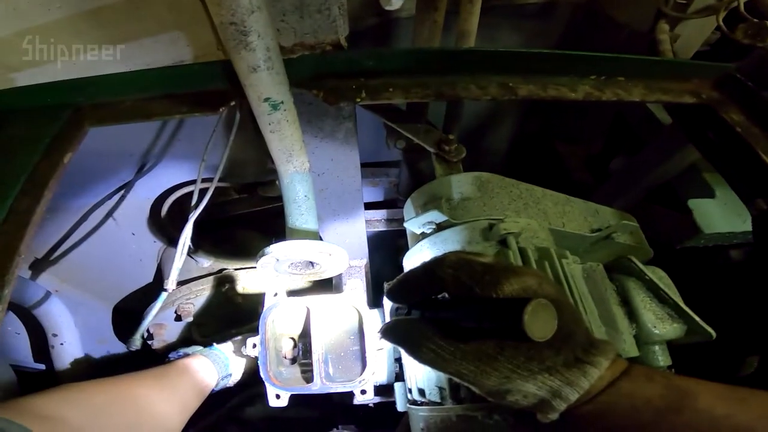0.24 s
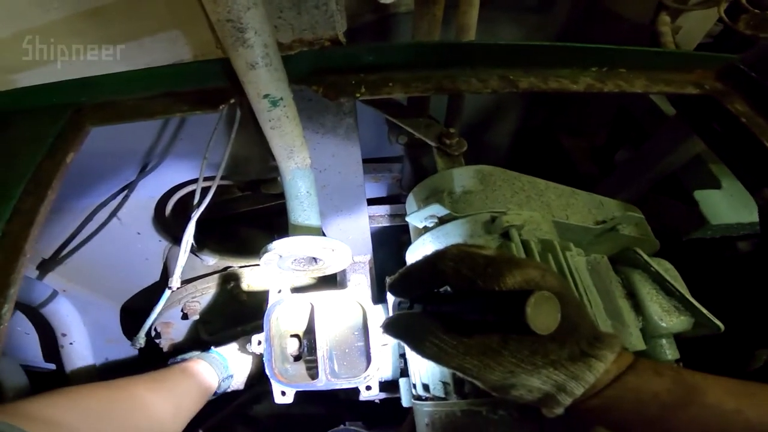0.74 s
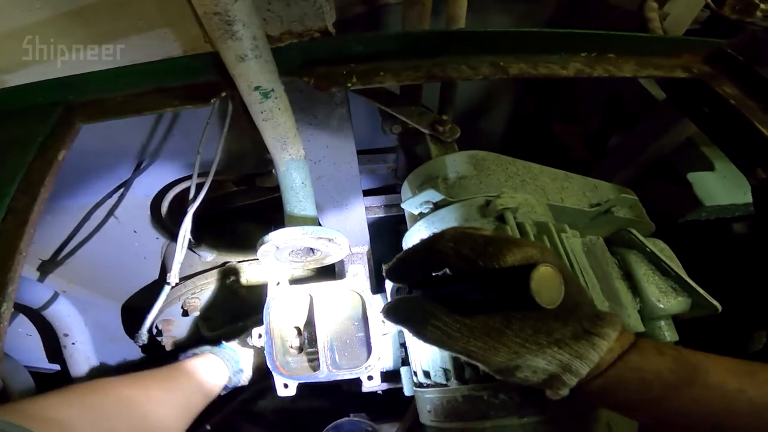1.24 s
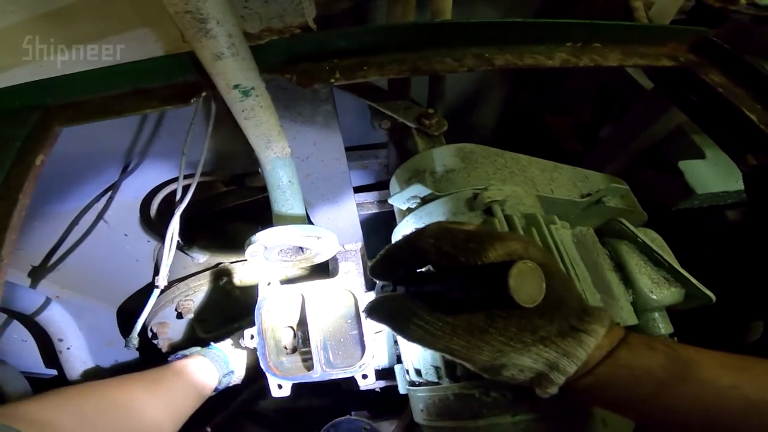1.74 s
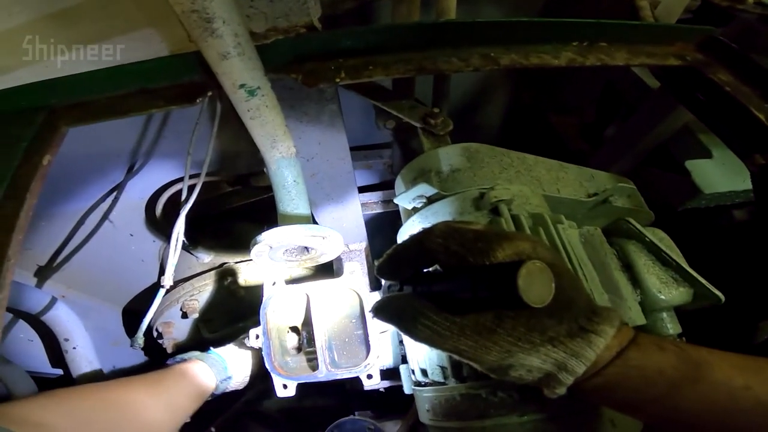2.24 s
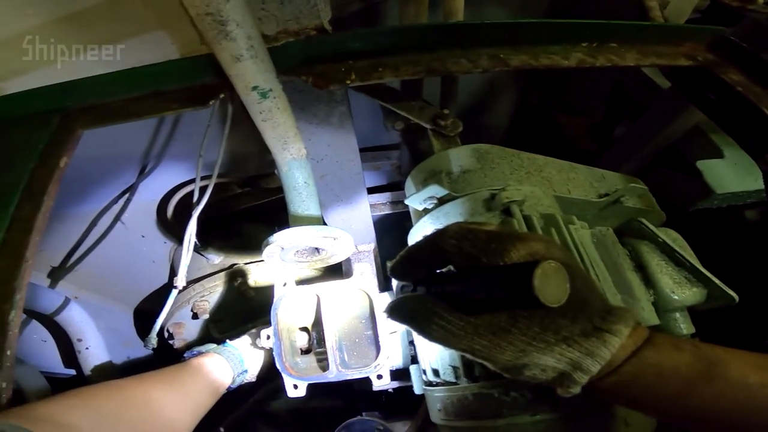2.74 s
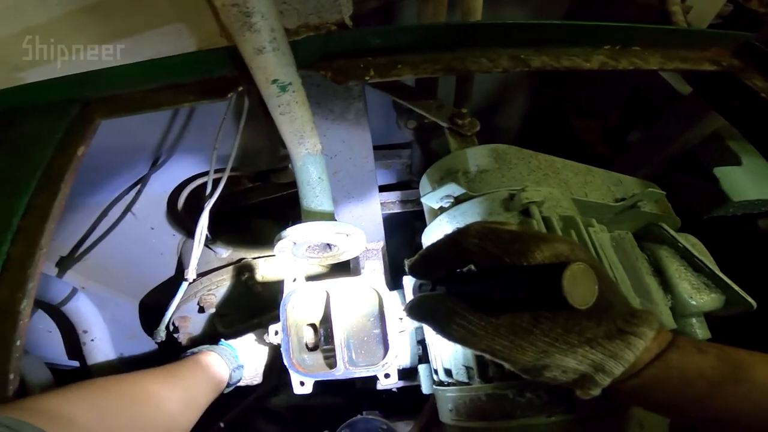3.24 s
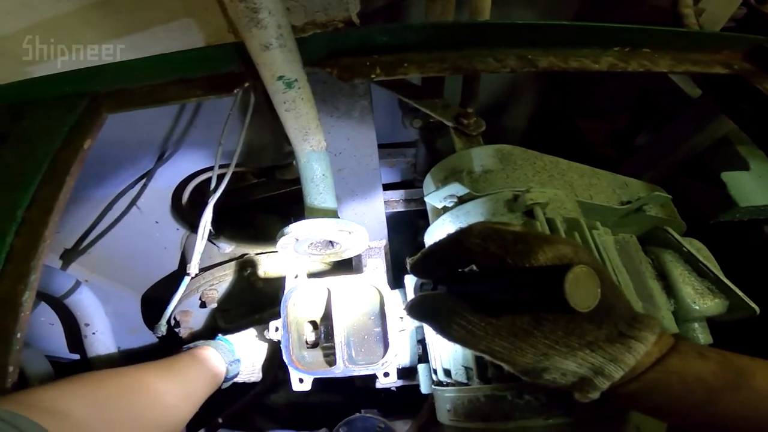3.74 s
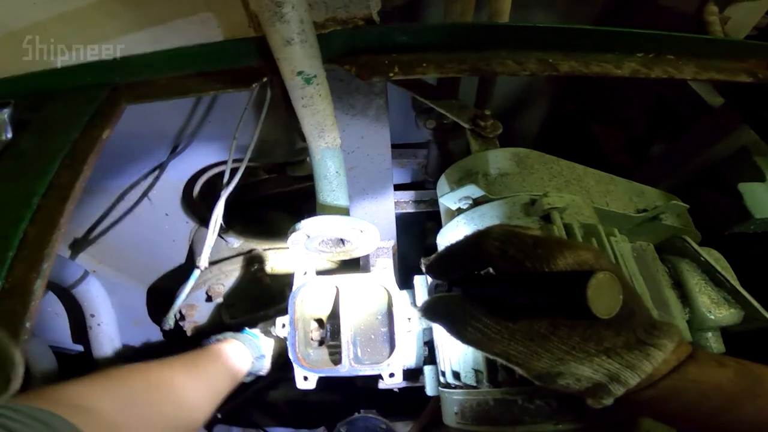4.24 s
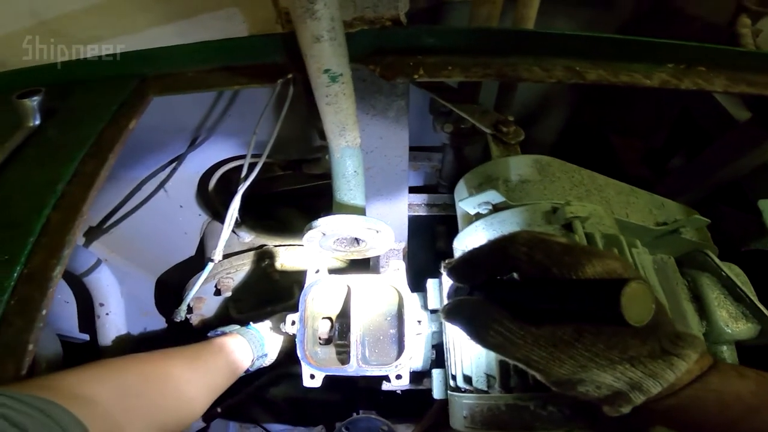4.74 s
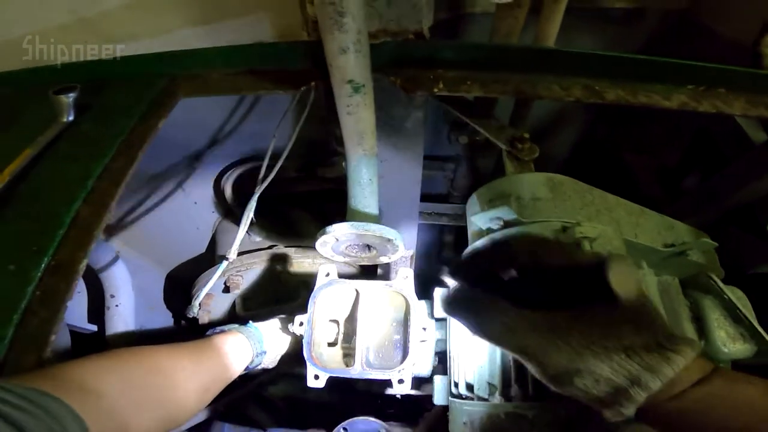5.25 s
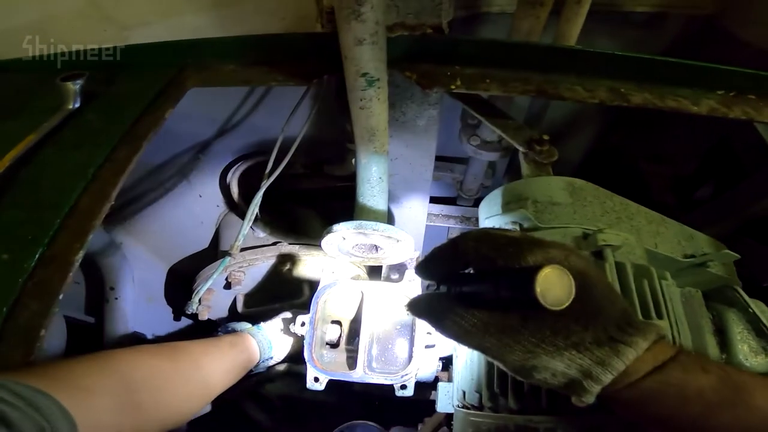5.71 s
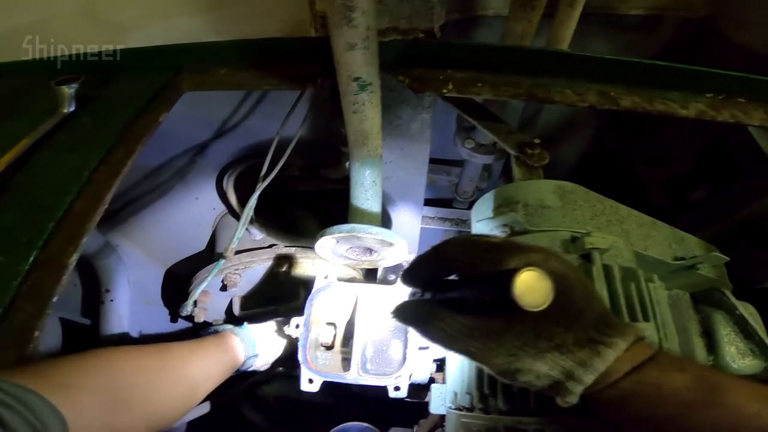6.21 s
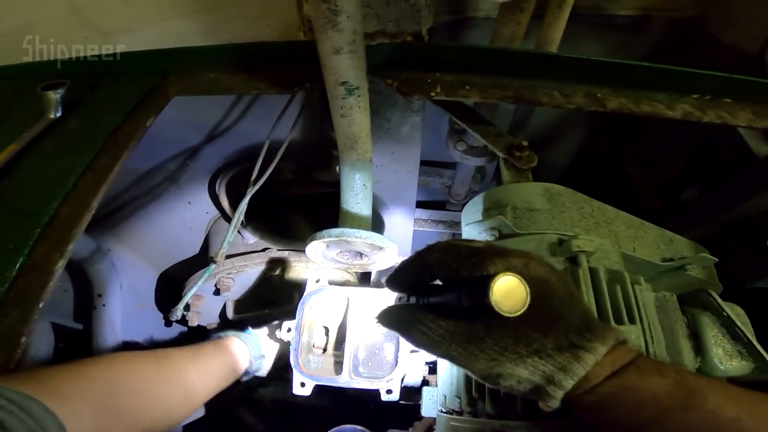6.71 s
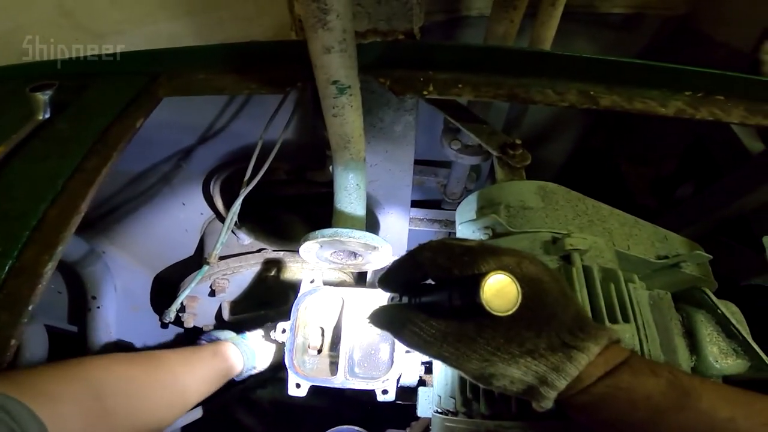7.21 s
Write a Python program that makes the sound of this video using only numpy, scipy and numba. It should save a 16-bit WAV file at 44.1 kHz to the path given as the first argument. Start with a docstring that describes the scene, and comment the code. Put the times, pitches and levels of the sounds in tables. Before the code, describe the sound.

Constant machinery roar in a steel hull, heavy in the lows, two engines humming together beneath a faint, fluttering high whistle.

```python
"""Ship's engine room under way

A slow main engine and a faster diesel generator drone through the steel, each a set of sine lines:
the main engine's waver in level, the generator's hold theirs.
Generator clatter is one burst of noise repeated every cycle; fans and pumps roar as noise shaped by the hull.
A turbocharger whines above on a blade tone with three overtones.
Two close microphone ports pick it up, and a gain control holds the loud sound down."""
import sys
import numpy as np
from scipy import signal
from scipy.fft import rfft, irfft
from scipy.io import wavfile
from scipy.ndimage import uniform_filter1d
from numba import njit

SR = 44100
rng = np.random.default_rng(int(sys.argv[2]) if len(sys.argv) > 2 else 0)


def digitize_waveform(pressure):
    """Quantize a signal to 16-bit integers and store it at the path in sys.argv[1].

    Rows of a 2-D input are taken as channels; values are limited to [-1, 1].
    """
    field = np.atleast_2d(pressure).T
    bounded = np.clip(field, -1, 1)
    quanta = np.round(bounded * 32767).astype(np.int16)
    wavfile.write(sys.argv[1], SR, quanta)


N = 329425  # length in samples

GENERATOR_CYCLE_HZ = 7.5092


def amp(db):
    """Turns decibels into a plain gain."""
    return 10 ** (np.asarray(db) / 20)


def at_hz(points, hz):
    """Reads a table between its points, on a log-frequency axis as the ear hears pitch."""
    table = np.array(points, float)
    return np.interp(np.log(hz + 1), np.log(table[:, 0]), table[:, 1])


def drift(rate_hz):
    """Slow random movement with spread 1: noise smoothed twice by a one-pole low-pass."""
    step = 40  # samples between drift points
    pole = np.exp(-2 * np.pi * rate_hz * step / SR)
    noise = rng.standard_normal(N // step + 4002)
    slow = signal.lfilter([1], [1, -2 * pole, pole * pole], noise)[4000:]  # drop the filter's start-up
    slow = (slow - slow.mean()) / slow.std()
    return np.interp(np.arange(N) / step, np.arange(len(slow)), slow)


def hum(cycle_hz, orders, wander_cycles, waver_db):
    """An engine's regular pulses make sines on whole multiples of its cycle, sharing one wandering phase."""
    cycles = np.arange(N) * cycle_hz / SR + wander_cycles * drift(0.42)
    out = np.zeros(N)
    for order, level_db in orders:
        level = amp(level_db + waver_db * drift(0.96))
        out += level * np.sin(2 * np.pi * (round(order) * cycles + rng.random()))
    side_gain = amp([[.25], [-.25]])  # slightly louder on the left
    return np.sqrt(2) * out * side_gain  # sqrt(2): table levels are RMS


def main_engine():
    """The slow main engine: a deep hum on the 12th to 72nd multiples of its turn rate, each wavering."""
    # Hum lines: multiple of the turn rate, level/dB
    main_orders = [(12, -73.5), (14, -61.5), (15, -71), (16, -66.5), (17, -67.5), (19, -70.5), (21, -63),
                   (23, -66), (24, -65.5), (27, -63.5), (28, -57.5), (32, -62), (33, -67.5), (38, -68.5),
                   (42, -53.5), (43, -65), (45, -59), (48, -53), (51, -69), (53, -53), (55, -52),
                   (59, -54.5), (69, -56), (72, -56)]
    return hum(1.7238, main_orders, wander_cycles=.0012, waver_db=2.5)


def generator():
    """The faster four-stroke diesel generator: multiples of its cycle rate, steady in level."""
    # Hum lines: multiple of the four-stroke cycle rate, level/dB
    generator_orders = [(12, -55.5), (14, -57.5), (17, -58.5), (18, -60.5), (22, -65.5), (25, -67),
                        (27, -62), (29, -54.5), (31, -55), (94, -67), (132, -67), (136, -68), (160, -72.5),
                        (178, -78.5), (207, -78.5), (231, -81)]
    return hum(GENERATOR_CYCLE_HZ, generator_orders, wander_cycles=0.0015, waver_db=0.0)


def at_ports(white, spectrum, lift_db=0):
    """Colours white noise for two ports: it reaches the left late, and the right is only partly alike."""
    # How alike the two ports hear the noise: f/Hz, likeness 0-1
    port_likeness = [(40, .996), (100, .9992), (180, .993), (350, .984), (700, .78), (1400, .72),
                     (2800, .68), (5600, .3), (8000, .05), (11000, 0)]
    # How much louder the left port is than the right: f/Hz, difference/dB
    left_bias = [(60, .2), (110, .2), (200, .8), (360, 1.3), (640, 2.2), (1160, 2), (2100, 3.8),
                 (3800, 2.5), (9000, -1)]
    left_lag_s = .00005
    hz = np.arange(N // 2 + 1) * SR / N
    gain = amp(at_hz(spectrum, hz) + lift_db) * np.sqrt(SR / 2)  # makes the table levels per Hz
    shared, own = rfft(white)
    alike = np.clip(at_hz(port_likeness, hz), 0, 1)
    left = shared * np.exp(-2j * np.pi * hz * left_lag_s)
    right = alike * shared + np.sqrt(1 - alike ** 2) * own
    bias = amp(at_hz(left_bias, hz) / 2)  # half the difference on each side
    return irfft(gain * np.array([left * bias, right / bias]), N)


def clatter():
    """Valves and injectors knock alike every cycle: one stretch of noise repeats at the generator's rate."""
    # Clatter spectrum: f/Hz, level/dB per Hz
    clatter_spectrum = [(250, -95.5), (500, -78), (1000, -83.5), (2000, -99), (3000, -103), (5000, -125),
                        (8000, -160)]
    cycle = rng.standard_normal((2, round(SR / GENERATOR_CYCLE_HZ)))
    repeats = N // cycle.shape[1] + 1
    return at_ports(np.tile(cycle, repeats)[:, :N], clatter_spectrum)


def roar(low_flicker_db=0.38, high_flicker_db=0.73):
    """Fans, pumps and combustion make broad noise, lifted by resonances; its upper ranges flicker."""
    # Roar spectrum before the resonances: f/Hz, level/dB per Hz
    roar_spectrum = [(14, -88.5), (32, -73), (60, -71), (78, -71.5), (125, -68.5), (160, -71.5), (205, -70),
                     (400, -67.5), (800, -86), (1050, -83), (2000, -92), (3000, -95.5), (4300, -104),
                     (7400, -112), (7900, -117), (10500, -126), (12400, -127)]
    # Hull and room resonances: centre f/Hz, width/Hz, lift/dB
    resonances = [(39, 8.7, 0), (117, 20, 2), (223, 12, 4.5), (235.1, 5.6, 10.5), (252.5, 5.8, 8),
                  (273.3, 10.8, 8.5), (296.7, 14.8, 8), (313, 9.2, 1.5), (342, 10, 2.5), (368, 5.6, 5),
                  (400, 5.4, 1), (514, 85, 5), (1290, 12, 2), (1733, 47, 5.5), (3700, 500, 1),
                  (8740, 1300, 4), (930, 78, 1.5), (10060, 590, 3)]
    hz = np.arange(N // 2 + 1) * SR / N
    lift_db = np.zeros(len(hz))
    for centre_hz, width_hz, peak_db in resonances:
        lift_db += peak_db / (1 + ((hz - centre_hz) / (width_hz / 2)) ** 2)
    noise = at_ports(rng.standard_normal((2, N)), roar_spectrum, lift_db)
    for edge_hz, flicker_db in ((1200, low_flicker_db), (3500, high_flicker_db)):
        high_pass = signal.butter(1, edge_hz, "high", fs=SR, output="sos")
        above = signal.sosfilt(high_pass, noise)
        quick = drift(11)
        quick -= uniform_filter1d(quick, size=SR // 3)  # keeps out slow surges
        noise = noise + above * (amp(flicker_db * quick) - 1)
    return noise


def turbocharger(wobble_hz=27, wobble=0.23):
    """Passing blades make a tone and three overtones; a level wobble adds fainter lines beside each."""
    # Blade tone's pitch: t/s, f/Hz
    blade_rate = [(0, 2465.9), (1.8, 2465.9), (3.2, 2467.9), (4.8, 2467.8), (6, 2469.7), (7.47, 2473.6)]
    # Swells and fades in the room's standing waves as the microphones sway:
    # t/s, blade tone level/dB, 2nd level/dB, 3rd level/dB, 4th level/dB, swaying lean to the left -1..1
    swells = [(0.2, -68, -81, -96, -101, 0.1), (0.45, -64.5, -77, -87, -98, 0.04),
              (1.15, -64.5, -75, -89, -101, -0.032), (1.5, -71.5, -74.5, -86, -92, -0.11),
              (1.8, -69.5, -81, -90, -96, -0.2), (2.3, -68.5, -75, -89, -95, -0.37),
              (2.85, -73.5, -76, -89, -99, -0.1), (3.25, -68, -75, -82, -102, 0.19),
              (3.9, -71.5, -75, -86.5, -109, 0.11), (4.35, -72, -76, -80, -101, 0.52),
              (4.8, -62, -73.5, -80, -101, 0.4), (5.05, -70.5, -74.5, -76, -93, 0.66),
              (5.3, -65, -76, -79.5, -98, 0.71), (5.6, -73.5, -73, -85, -96, 0.11),
              (6.0, -74.5, -83, -87, -107, -0.57), (6.5, -77, -80.5, -79, -103, -0.33),
              (7.0, -74, -80, -85, -102, -0.09), (7.3, -78, -71.5, -82, -98, -0.064)]
    # Each partial's own way to the ports, one row per partial: own lean to the left -1..1,
    # share of the swaying lean, level/dB of an echo opposed between ports, waver/dB, flutter/dB
    partial_paths = [(0.43, 0.05, -75.5, 2, 0.8), (0.02, 1, -84, 1.8, 1.9), (.5, .3, -86, 2, 1),
                     (-.08, .2, -101, 2, 3)]
    waver_hz, flutter_hz = 4.9, 27  # rates of the slower and quicker random level changes
    t = np.arange(N) / SR
    phase = 2 * np.pi * np.cumsum(np.interp(t, *np.transpose(blade_rate))) / SR
    swell_s, *levels, sway = np.transpose(swells)
    swaying_lean = np.interp(t, swell_s, sway)
    wobbling = 1 + wobble * np.sin(2 * np.pi * wobble_hz * t + 2.0 * drift(0.7))
    left_right = np.array([[1], [-1]])
    out = np.zeros((2, N))
    for partial, (level_db, path) in enumerate(zip(levels, partial_paths), start=1):
        own_lean, sway_share, echo_db, waver_db, flutter_db = path
        unsteady_db = waver_db * drift(waver_hz) + flutter_db * drift(flutter_hz)
        direct_level = amp(np.interp(t, swell_s, level_db) + unsteady_db)
        direct = direct_level * np.sin(partial * phase + .45 * drift(3.3))
        leaning = np.clip(own_lean + sway_share * swaying_lean, -1, 1)
        # sound off the steel walls arrives with a drifting phase
        echo = amp(echo_db + 3 * drift(2.5)) * np.sin(partial * phase + 2.5 * drift(1.2))
        out += direct * (1 + leaning * left_right) + echo * left_right
    return np.sqrt(2) * wobbling * out


def scene():
    """All the machines run together and their sounds add up."""
    return main_engine() + generator() + clatter() + roar() + turbocharger()


@njit
def follow(level, attack, release):
    """Follows the peaks: moves quickly up towards a louder level and sinks slowly."""
    out, held = np.empty_like(level), level.mean()
    for i in range(len(level)):
        held += (level[i] - held) * (attack if level[i] > held else release)
        out[i] = held
    return out


def record(dry):
    """Gain control looks a moment ahead and turns both channels down together; a low-pass cuts the top."""
    hold_db, makeup_db = -38, 6.5
    squeeze = 0.83  # share of the excess in dB taken away: 0 none, 1 all
    attack_s, release_s = 0.00092, 0.045
    cutoff_hz = 12780
    ahead = np.roll(np.abs(dry).max(axis=0), -round(attack_s * SR))
    held = follow(ahead, 1 / (attack_s * SR), 1 / (release_s * SR))
    excess = np.maximum(held / amp(hold_db), 1)
    gain = excess ** -squeeze * amp(makeup_db)
    low_pass = signal.ellip(14, .5, 50, cutoff_hz, fs=SR, output="sos")  # ripple .5 dB, stop 50 dB
    return signal.sosfilt(low_pass, dry * gain)


dry = scene()
out = record(dry)
digitize_waveform(out)
```